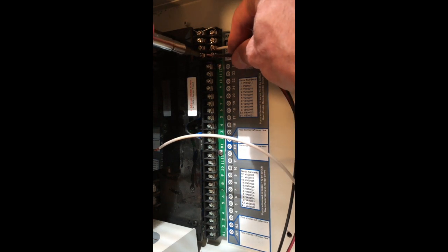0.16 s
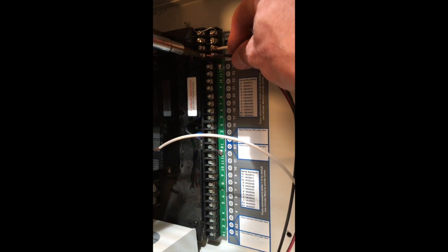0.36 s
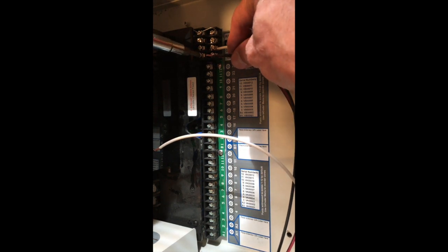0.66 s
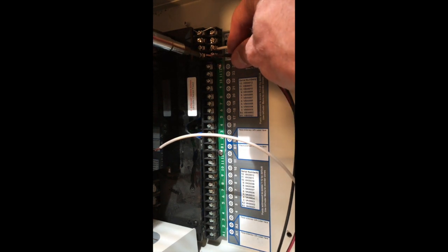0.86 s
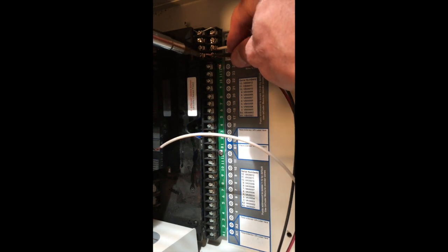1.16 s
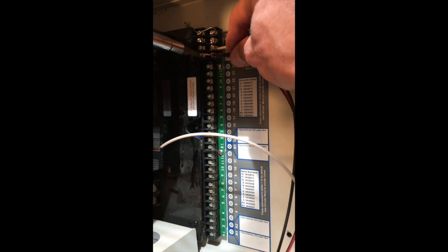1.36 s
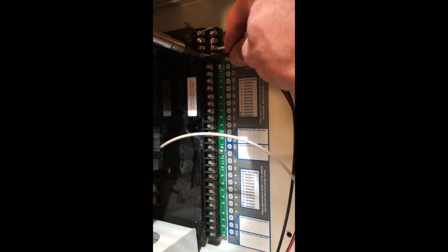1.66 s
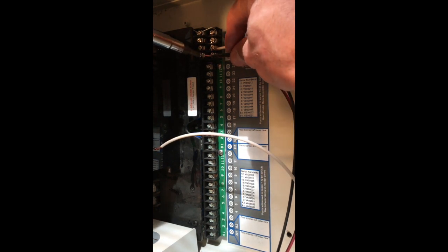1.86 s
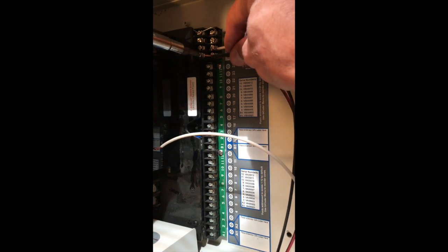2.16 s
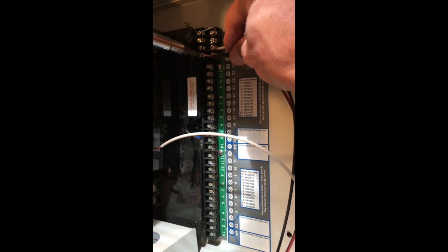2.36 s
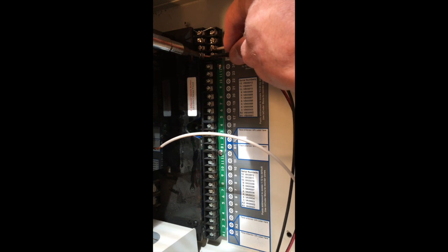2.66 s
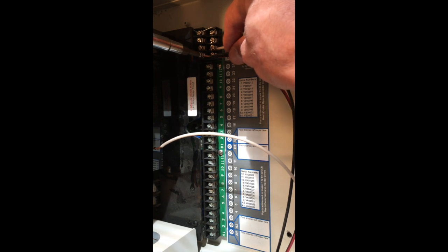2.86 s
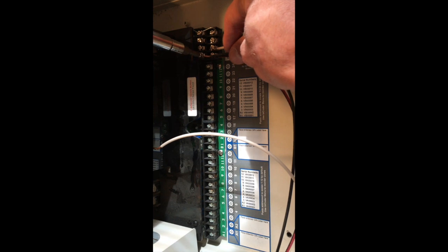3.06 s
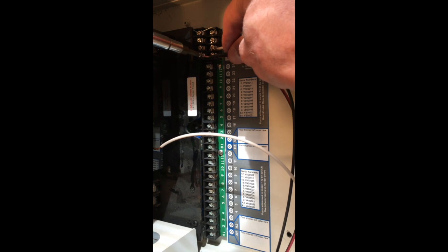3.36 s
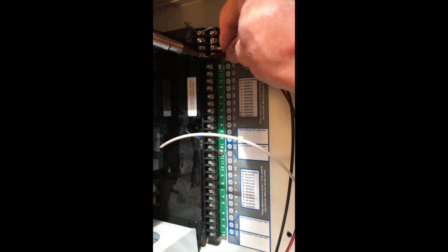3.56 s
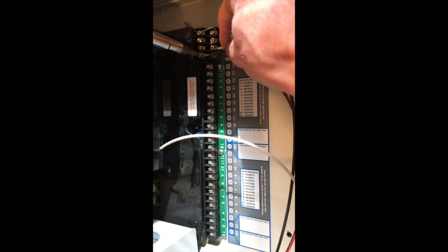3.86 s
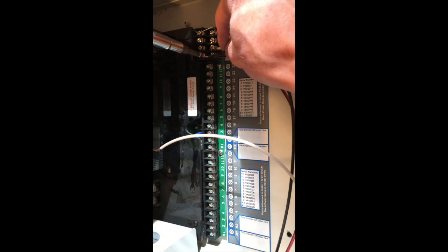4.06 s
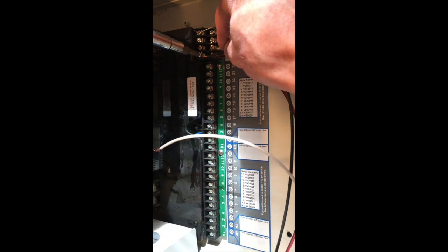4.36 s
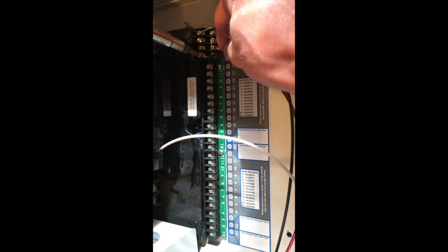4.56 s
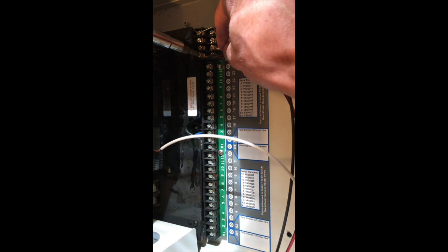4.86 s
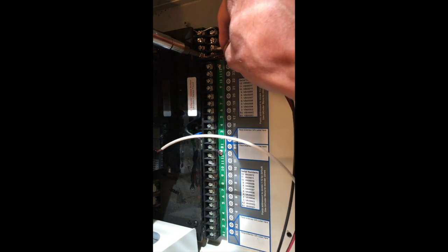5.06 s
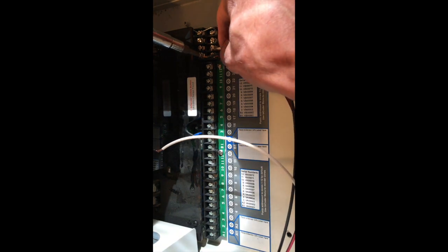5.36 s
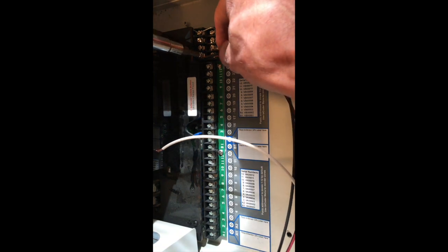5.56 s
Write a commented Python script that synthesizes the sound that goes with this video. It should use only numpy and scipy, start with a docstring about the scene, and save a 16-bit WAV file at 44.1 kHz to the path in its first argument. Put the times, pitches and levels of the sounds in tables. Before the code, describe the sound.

A hand works a screwdriver against small screw terminals in a metal cabinet. Uneven dull knocks and rubbing come first, then a hard clack just after one second, two sharper metallic clacks near three seconds, and finally softer ticks and light scrapes. The sound is close, dry and mono, in a quiet indoor space with a faint low rumble and thin hiss.

```python
"""Screwdriver in a metal cabinet

A hand turns a screwdriver on the screw terminals of a controller board inside a sheet-metal cabinet.
Knocks ring cabinet and board as decaying modes with a puff of noise; a few leave single sine tones.
Rubbing is uneven noise through the same modes, scrapes are gritty noise full of tiny snags.
Blade-tip ticks are short noise bands; a lumpy filtered rumble and a thin hiss fill the room."""
import sys
import numpy as np
from scipy import signal
from scipy.fft import rfft, irfft, next_fast_len
from scipy.io import wavfile
from scipy.ndimage import uniform_filter1d, map_coordinates

SR = 44100
rng = np.random.default_rng(int(sys.argv[2]) if len(sys.argv) > 2 else 0)


def wav_record(signal):
    """Record a signal, one row per channel, as 16-bit PCM in the file named by sys.argv[1]."""
    frames = np.transpose(np.atleast_2d(signal))
    bounded = np.clip(frames, -1, 1)
    # unit amplitude maps onto the largest positive 16-bit level
    quanta = np.round(bounded * 32767).astype(np.int16)
    wavfile.write(sys.argv[1], SR, quanta)


N = 252252

SHAFT_HZ, BLADE_HZ = 1464, 4322  # pitches that recur among the lingering tones
# modes of cabinet and board: f/Hz, relative level/dB, t60/s when free of the hand
BODY_MODES = [(120.5, 14, 0.2), (169.4, 1.5, 0.34), (235.5, 1.5, 0.19), (336.9, 5.5, 0.2),
              (374, -2.5, 0.017), (364, 8.5, 0.16), (472.7, 1, 0.074), (548, 0, 0.1), (606, -12, 0.23),
              (694.5, -2, 0.11), (768, -2.5, 0.05), (816, -10.5, 0.24), (881.5, -5, 0.12), (929, -4, 0.08),
              (1053, -16.5, 0.22), (1198, -7, 0.061), (1402, -8, 0.05), (1513, -9.5, 0.12),
              (1590, -10, 0.053), (1710, -2.5, 0.021), (1764, -10, 0.052), (1940, -10, 0.022),
              (1960, -9.5, 0.044), (2298, -21, 0.12), (2400, -33, 0.21), (3217, -5, 0.097),
              (3702, -5, 0.091)]


def amp(db):
    """Gain of a level in dB."""
    return 10 ** (np.asarray(db) / 20)


def unit(x):
    """x at rms 1."""
    return x / np.sqrt(np.mean(x ** 2) + 1e-20)


def along(points, hz):
    """(Hz, value) points read on a log frequency axis."""
    f, value = np.transpose(points)
    return np.interp(np.log(hz + 1), np.log(f + 1), value)


def wobble(rate):
    """A smooth random curve through rate knots a second."""
    knots = rng.standard_normal(int(N * rate / SR) + 4)
    return map_coordinates(knots, [np.arange(N) * rate / SR])


def filtered(x, response):
    """x shaped in the spectrum by a real or complex response of frequency."""
    m = next_fast_len(N + SR // 2)
    return irfft(rfft(x, m) * response(np.fft.rfftfreq(m, 1 / SR)), m)[..., :N]


def add(track, s, sound):
    """Mixes a sound into a track at s seconds."""
    track[round(max(s, 0) * SR):][:len(sound)] += sound


def grit(spiky_db, rate):
    """Noise of rms 1 whose level wanders as surfaces catch and slip."""
    return unit(rng.standard_normal(N) * amp(spiky_db * wobble(rate)))


def body(f, lo_hz, hi_hz, blur):
    """Response of the modes between two frequencies to a steady drag; the touching hand widens them blur times."""
    response, sign = 0, 1
    for centre_hz, db, t60 in BODY_MODES:
        if lo_hz < centre_hz < hi_hz:
            width_hz = blur * np.log(1000) / (np.pi * t60)
            resonance = 1j * f / (centre_hz ** 2 - f * f + 1j * f * width_hz)
            response = response + sign * amp(db) * np.sqrt(width_hz) * resonance
            sign = -sign  # successive modes in the table alternate in sign
    return response


def room():
    """A lumpy low rumble under a steady hiss, both noise shaped by fixed spectra."""
    # level of the rumble: t/s, level/dB
    rumble_level = [(0.0, -67), (0.86, -70.5), (1.19, -65), (1.38, -71), (2.13, -68.5), (2.32, -56.5),
                    (2.58, -71.5), (3.01, -71), (3.23, -72.5), (3.6, -67.5), (3.98, -69), (4.57, -66.5),
                    (5.37, -68.5), (5.72, -62)]
    # spectrum of the rumble: f/Hz, relative density/dB
    rumble_tone = [(15, -50), (30, -5), (60, 8.5), (110, 8), (180, -18.5), (300, -15), (600, -62)]
    # spectrum of the hiss: f/Hz, relative density/dB
    hiss_tone = [(90, -41), (150, -6), (350, -10), (640, -24), (1500, -24.5), (2750, -37), (3300, -31),
                 (4900, -36.5), (6000, -34.5), (7600, -38), (9400, -35.5), (10500, -45), (11400, -37),
                 (14600, -41), (15600, -41)]
    hiss_db = -70
    rumble_db = np.interp(np.arange(N) / SR, *np.transpose(rumble_level))
    rumble = filtered(grit(1.3, rate=3.5), lambda f: amp(along(rumble_tone, f)))
    hiss = filtered(rng.standard_normal(N), lambda f: amp(along(hiss_tone, f)))
    return amp(rumble_db) * unit(rumble) + amp(hiss_db) * unit(hiss)


def scrapes():
    """Short soft-ended strokes of skin and steel: gritty noise with many tiny decaying snags."""
    # scrapes: t/s, length/s, level/dB
    scrape_list = [(0, .067, -78), (0.193, 0.088, -74), (0.249, 0.047, -70.5), (0.289, 0.082, -76),
                   (0.38, 0.027, -71), (0.544, 0.023, -73), (0.565, 0.111, -69.5), (0.74, 0.029, -75),
                   (0.946, 0.08, -74), (1.13, .022, -74.5), (1.272, .022, -48), (1.31, .15, -72),
                   (1.49, .047, -74.5), (1.67, 0.093, -72), (1.762, .025, -81), (2.03, 0.041, -74),
                   (2.06, 0.14, -74.5), (2.266, .035, -77), (2.439, 0.067, -69.5), (2.537, 0.04, -78.5),
                   (2.626, .02, -78), (2.827, 0.038, -65), (2.995, 0.017, -77), (3.21, .104, -77),
                   (3.262, 0.017, -70), (3.375, 0.034, -80), (3.667, .042, -81), (4.291, 0.027, -82),
                   (4.345, .048, -73), (4.493, .022, -76.5), (4.566, 0.018, -74), (4.708, 0.024, -69.5),
                   (4.946, 0.052, -79.5), (5.331, 0.026, -70), (5.416, 0.069, -78.5), (5.492, 0.17, -83)]
    # colour of the rubbing surfaces before a gentle bass cut: f/Hz, relative density/dB
    skin_tone = [(1200, -39), (2200, 7), (2800, -17), (3400, 3), (5300, -4.5), (6100, 0), (7400, -9),
                 (8700, -2.5), (10800, -11.5), (11800, -7.5), (16000, -13.5)]
    snags_per_s, snag_db, snag_spread_db, snag_t60_s = 160, 2, 1, 0.008
    stroke = np.zeros(N + SR)
    for s, length, db in scrape_list:
        add(stroke, s, np.full(round(length * SR), amp(db)))
    soft_stroke = uniform_filter1d(stroke[:N], round(0.0086 * SR))

    chance, size = rng.random(N), rng.standard_normal(N)
    snags = (chance < snags_per_s / SR) * amp(snag_db + snag_spread_db * size)
    snag_decay = amp(-60 * np.arange(SR // 20) / SR / snag_t60_s)
    uneven = amp(2.6 * wobble(70)) + signal.fftconvolve(snags, snag_decay)[:N]
    hiss = filtered(grit(0.89, rate=250) * uneven, lambda f: amp(along(skin_tone, f)) * f / (f + 1500))
    return soft_stroke * unit(hiss)


def rubbing():
    """Uneven drag shakes cabinet and board modes; each stroke builds, holds and eases off."""
    # pushes and turns of hand and shaft: full pressure t/s, hold/s, cabinet level/dB, board level/dB
    stroke_list = [(0, 0.023, -49, -55.5), (0.229, 0.052, -50.5, -57), (0.36, .12, -65.5, -68.5),
                   (0.616, 0.037, -45.5, -59), (0.948, 0.042, -50, -61.5), (1.167, 0.026, -46.5, -61),
                   (1.328, 0.036, -49.5, -56.5), (1.523, 0.034, -65.5, -82), (1.701, 0.059, -55.5, -58),
                   (1.885, 0.033, -61, -88), (2.057, 0.094, -56.5, -62), (2.306, 0.026, -48.5, -64),
                   (2.454, 0.038, -53.5, -61), (2.613, 0.034, -60, -75), (2.805, 0.061, -52.5, -58.5),
                   (2.987, 0.028, -50.5, -58), (3.202, 0.11, -56.5, -66.5), (3.474, 0.14, -65, -66),
                   (3.749, 0.028, -60, -70.5), (3.884, 0.03, -71, -69.5), (4.133, 0.023, -64, -67),
                   (4.357, 0.032, -55, -67.5), (4.567, 0.2, -58, -68.5), (4.944, 0.061, -62, -69),
                   (5.19, .04, -69, -75), (5.357, 0.12, -61, -70), (5.518, 0.18, -62.5, -68)]
    press_db_per_s, ease_db_per_s = 307, 178.5
    s, hold, cabinet_db, board_db = np.transpose(stroke_list)[..., None]
    t = np.arange(N) / SR
    press_db = -press_db_per_s * np.maximum(s - t, 0)
    ease_db = -ease_db_per_s * np.maximum(t - s - hold, 0)
    shape = amp(press_db + ease_db)
    cabinet = filtered(grit(2.2, rate=40), lambda f: body(f, 200, 440, blur=1.4))
    board = filtered(grit(3.15, rate=44), lambda f: body(f, 440, 3000, blur=3.53))
    cabinet_level = np.sum(amp(cabinet_db) * shape, axis=0)
    board_level = np.sum(amp(board_db) * shape, axis=0)
    return cabinet_level * unit(cabinet) + board_level * unit(board)


def ticks():
    """Tiny bright contacts of steel on brass: a band of noise that dies at once."""
    # ticks of the blade tip: t/s, relative level/dB, centre f/Hz, half width/octaves
    tick_list = [(0.0303, -50.5, 8860, .36), (0.166, -55.5, 5450, 0.54), (0.184, -53, 4120, .3),
                 (0.383, -65, 8000, .7), (0.511, -68, 7020, .9), (0.5689, -54, 5000, 0.6),
                 (0.905, -57.5, 5000, 0.61), (0.935, -59, 8050, 0.37), (1.2774, -48, 3680, .4),
                 (2.0507, -51, 3060, .9), (2.1311, -63, 11300, 0.3), (2.2897, -47.5, 3740, 0.17),
                 (2.323, -63, 10100, .6), (2.415, -60, 8000, .8), (2.6206, -54, 6500, 0.68),
                 (2.795, -53, 8170, .47), (2.8614, -60, 8950, .4), (2.888, -60, 6320, 0.37),
                 (2.9434, -32.5, 3600, 0.15), (3.206, -54.5, 4380, .33), (3.455, -35.5, 3400, 0.086),
                 (3.559, -65.5, 3700, .35), (3.6524, -63, 11300, .3), (3.8487, -61, 3840, 0.75),
                 (3.9795, -64, 6860, .2), (4.099, -58.5, 5460, 0.4), (4.1484, -62.5, 6110, 0.22),
                 (4.586, -50.5, 3960, .5), (4.65, -67, 4200, 0.17), (4.944, -53, 11700, 0.33),
                 (5.2807, -65.5, 14050, .3), (5.443, -60, 12000, 0.21)]
    t60_s, rise_s = 0.037, 0.00059
    out, t = np.zeros(N + SR), np.arange(SR // 8) / SR
    for s, db, centre_hz, octaves in tick_list:
        edges_hz = centre_hz * 2 ** (octaves * np.array([-1, 1]))
        band = signal.butter(1, edges_hz, "band", fs=SR, output="sos")
        burst = unit(signal.sosfilt(band, rng.standard_normal(len(t))))
        envelope = amp(db - 4.0 - 60 * t / t60_s) * (1 - np.exp(-t / rise_s))
        add(out, s - 0.001, envelope * burst)
    return out[:N]


def tones():
    """Single decaying sines that linger after a few knocks until a touch stops them."""
    # lingering tones: t/s, f/Hz, level/dB before the soft ends, t60/s, length/s
    tone_list = [(0, SHAFT_HZ, -52, 0.21, 0.2), (1.282, 3150, -46, .07, .06),
                 (1.286, 3710, -44.5, 0.077, .07), (1.288, BLADE_HZ, -40, 0.042, 0.04),
                 (2.295, 120.7, -42, 0.37, 0.15), (2.939, 1970, -25, 0.055, .05),
                 (2.94, 836, -17.5, 0.056, .1), (2.943, 1860, -30.5, 0.13, 0.15),
                 (2.97, SHAFT_HZ, -60.5, 0.71, 0.21), (3.202, BLADE_HZ, -77, 0.66, 0.12),
                 (3.451, 829, -22, 0.07, .1), (4.709, 1592, -42.5, 0.057, .05),
                 (4.71, 724, -41, 0.11, 0.073), (4.715, 1216, -39.5, 0.12, 0.1)]
    out = np.zeros(N + SR)
    for s, hz, db, t60, length in tone_list:
        t = np.arange(round(length * SR)) / SR
        soft_ends = (1 - np.exp(-t / 0.0041)) * (1 - np.exp((t - length) / 0.012))
        add(out, s, amp(db - 60 * t / t60) * soft_ends * np.sin(2 * np.pi * hz * t))
    return out[:N]


def knocks():
    """Each knock rings the body at new strengths and leaves a diffuse puff that dies band by band."""
    # knocks: t/s, strength/dB, then against strength: thud/dB, hollow/dB, upper board/dB, edge/dB; rise/s at 800 Hz
    knock_list = [(0.002, -36, -9.5, -20, -7.5, -25, 0.0011), (0.166, -55, -16, -2, 0, -7, .0031),
                  (0.208, -40.5, -4.5, 3, -4, -25, 0.0033), (0.492, -57, -4, 6, -26, -20, 0.0028),
                  (0.541, -53.5, -8, 7.5, 3.5, -23, 0.0026), (0.568, -35.5, -21, 5, -5, -34, 0.00199),
                  (0.655, -45.5, -15, 8.5, 0.5, -25, .0021), (0.904, -41.5, -23, 6, -2.5, -24, 0.0028),
                  (1.107, -50.5, -10, 5, -13, -20, 0.0038), (1.128, -28.5, -12, 0, -1.5, -23, 0.0046),
                  (1.273, -21, -30.5, 1.5, -5.5, -16.5, 0.0065), (1.65, -58.5, -1, -2, 5, -28, 0.0045),
                  (1.671, -40, -19, 3, -11.5, -43, 0.0037), (1.731, -40.5, -3, 0, -39, -31, 0.0042),
                  (1.864, -49, -36, 1.5, -6.5, -35, 0.0024), (2.054, -36.5, -22, 4, -6, -27, 0.0022),
                  (2.285, -29, -28, -9, -2, -30, 0.0021), (2.412, -64.5, 11, 21, -9, 2, .007),
                  (2.616, -49, -24, 6, -3.5, -29, 0.0057), (2.755, -52, -11, 0, 2, -18, 0.0035),
                  (2.795, -41.5, -58, 7.5, -12, -20, .003), (2.857, -55.5, -18, 16.5, -7, -19, 0.0023),
                  (2.939, -21.5, -23, -11, 3.5, -20, .0036), (3.206, -38, -39, 3.5, -4, -30, 0.0037),
                  (3.254, -54.5, -18, 11.5, -1, -23, 0.0038), (3.448, -23.5, -23, -3.5, 2, -23, 0.0081),
                  (3.75, -56, -22, -2, -8, -28, 0.0017), (3.848, -57.5, -10, -23, -3.5, -4.5, .006),
                  (3.983, -60, -4, 3, 0, -13, 0.0021), (4.029, -65.5, -11, -3, 4.5, -7, 0.003),
                  (4.101, -58.5, -13, 1.5, 0, -10, .0047), (4.314, -73, 10, 14, -2, -6, 0.0031),
                  (4.353, -52, -28, 12, 1.5, -15, 0.0026), (4.492, -63, -1, 11, -3, -29, 0.0033),
                  (4.588, -36.5, -61, 6, -6.5, -25, 0.0037), (4.707, -36.5, -45, -7.5, -15, -23, .0035),
                  (4.726, -41, -28, -5.5, -3, -28, .0036), (4.932, -52.5, -20, -2, -3.5, -14, .0082),
                  (5.131, -62.5, -1, 7, 6, -13, 0.0036), (5.164, -60, -21, -8, 8.5, -11, 0.0029),
                  (5.26, -58, -22, -2, -5, -21, 0.0044), (5.425, -66, 1, 19, 0, -17, 0.0033),
                  (5.454, -50, -16, -4, -6.5, -22, 0.0046), (5.597, -64, 6, -5, 12, 0.5, 0.0061),
                  (5.684, -69, -5, -3, 12, -4, 0.0029)]
    # centres of thud, hollow, board, upper board, metal and treble: f/Hz
    colour_hz = [130, 350, 800, 1750, 3700, 10000]
    # the hand eases off the cabinet: t/s, share of the free ring time
    freedom = [(0, 0.81), (2.1, 0.84), (2.9, 1), (5.72, 1)]
    # diffuse decay in the cabinet: f/Hz, t60/s when free of the hand
    diffuse_t60 = [(100, 1), (350, 0.19), (1000, 0.15), (3500, 0.099), (10000, 0.079)]
    metal_db, treble_db = 2.5, -3  # how the edge of a knock divides
    soft_db, dulling = -34, 0.25  # treble dB lost per dB of strength above soft_db
    rings, puffs, t = np.zeros(N + SR), np.zeros(N + SR), np.arange(SR // 3) / SR
    hz, mode_db, t60 = np.transpose(BODY_MODES)[..., None]

    for s, db, thud, hollow, upper, edge, rise in knock_list:
        free = np.interp(s, *np.transpose(freedom))
        treble = edge + treble_db - dulling * max(db - soft_db, 0)
        colour = list(zip(colour_hz, [thud, hollow, 0, upper, edge + metal_db, treble]))

        def swell(f):
            """Build-up of the push, later for lower frequencies."""
            return 1 - np.exp(-(t / (rise * (900 / (f + 100)) ** 0.54)) ** 2)

        level_chance, crest_chance = rng.standard_normal((2, len(BODY_MODES), 1))
        level_db = mode_db + along(colour, hz) + 3.92 * level_chance - 60 * t / (t60 * free)
        crest_s = 1.3 * rise + 0.00294 + 0.00022 * crest_chance  # the modes nearly line up here
        modes = amp(level_db) * swell(hz) * np.cos(2 * np.pi * hz * (t - crest_s))
        add(rings, s - 0.002, amp(db - 7.0) * np.sum(modes, axis=0))

        f, frame_s, z = signal.stft(rng.standard_normal(len(t)), SR, nperseg=256, noverlap=224)
        slope_db = -3 * np.log2(f / 800 + 0.0057)  # wider bands higher up hold less per Hz
        start_db = along(colour, f) + slope_db
        fade_db = -60 * frame_s / (along(diffuse_t60, f)[:, None] * free)
        puff = signal.istft(z * amp(start_db[:, None] + fade_db), SR, nperseg=256, noverlap=224)[1]
        add(puffs, s - 0.002, amp(db + 5) * swell(1400) * puff[:len(t)])

    # the puffs pass through the board, and lower down mostly the modes remain
    puffs = filtered(puffs[:N], lambda f: 1 + amp(20.0) * body(f, 440, 4000, blur=2.64))
    puffs = filtered(puffs, lambda f: amp(-4.5) + (1j * f / (1j * f + 420)) ** 2)
    # the microphone's low cut thins the knocks below about 70 Hz
    return filtered(rings[:N] + puffs, lambda f: (1j * f / (1j * f + 70)) ** 3)


def scene():
    """All layers summed into one channel."""
    return (room() + scrapes() + rubbing() + ticks() + tones() + knocks())[None]


def record(dry):
    """A sharp band limit keeps nothing above 15750 Hz."""
    return filtered(dry, lambda hz: hz < 15750)


dry = scene()
out = record(dry)
wav_record(out)
```